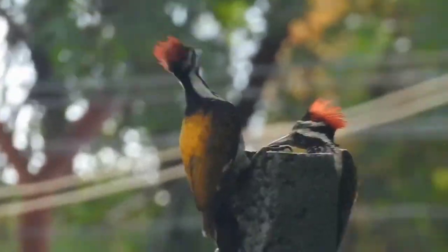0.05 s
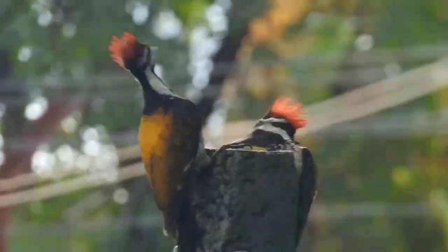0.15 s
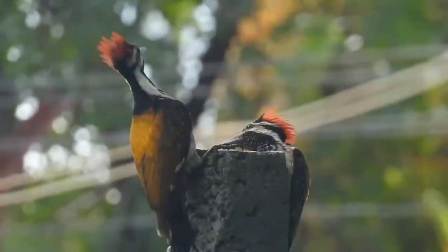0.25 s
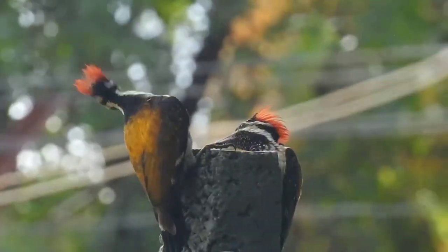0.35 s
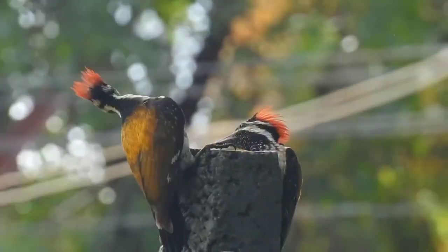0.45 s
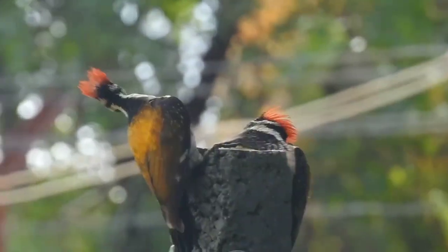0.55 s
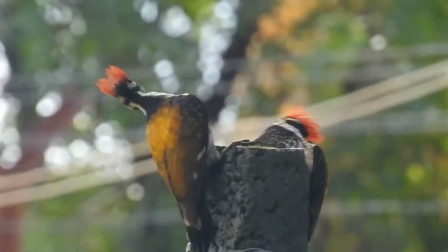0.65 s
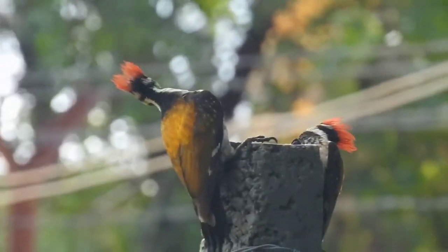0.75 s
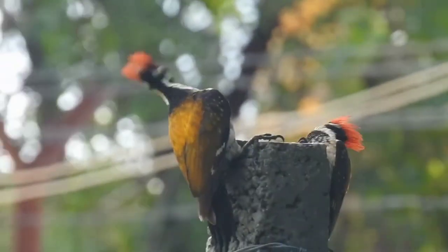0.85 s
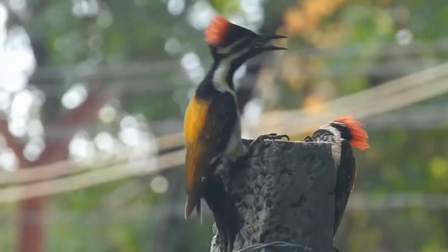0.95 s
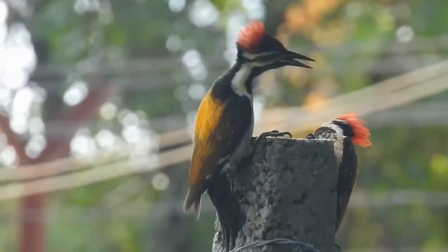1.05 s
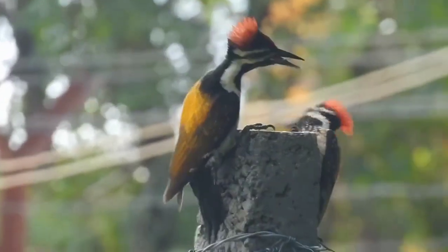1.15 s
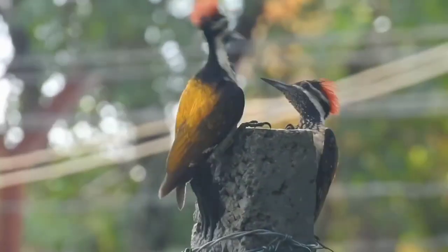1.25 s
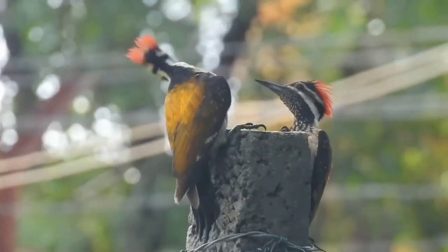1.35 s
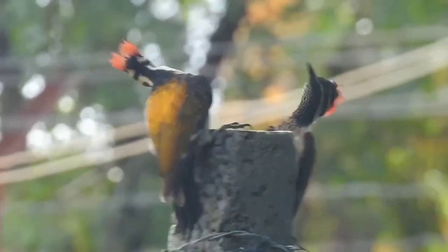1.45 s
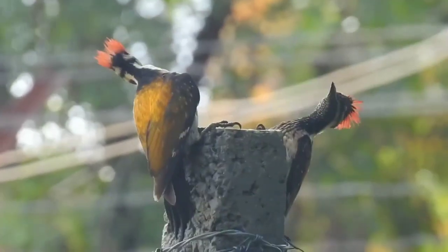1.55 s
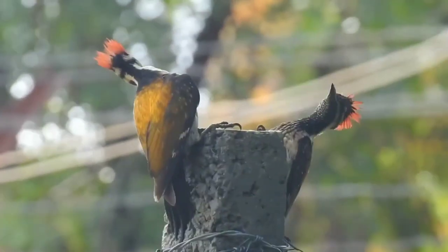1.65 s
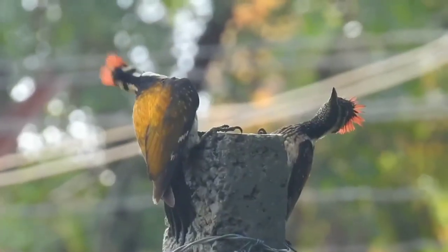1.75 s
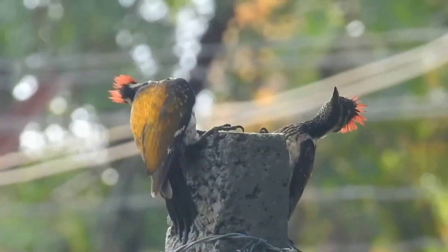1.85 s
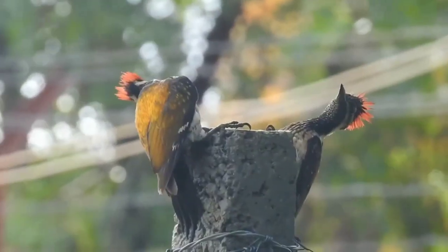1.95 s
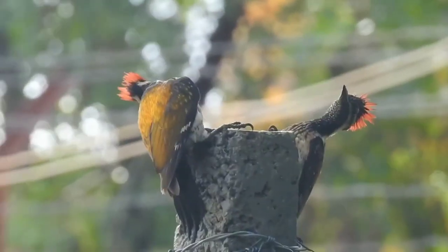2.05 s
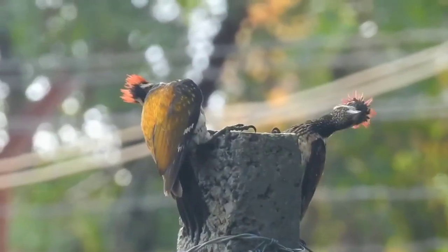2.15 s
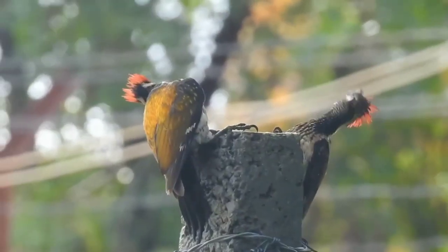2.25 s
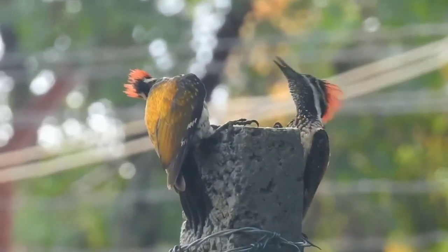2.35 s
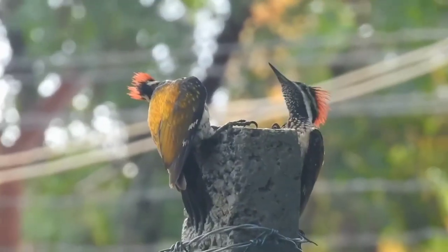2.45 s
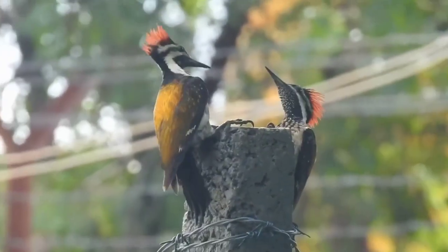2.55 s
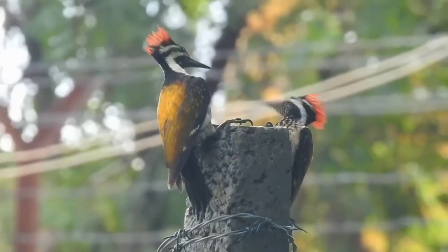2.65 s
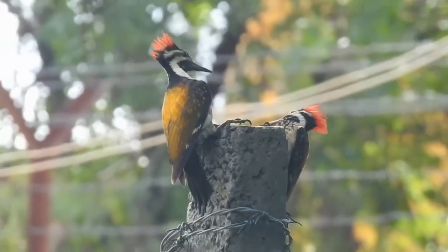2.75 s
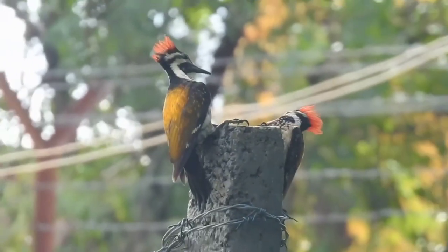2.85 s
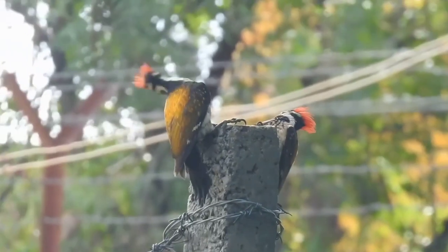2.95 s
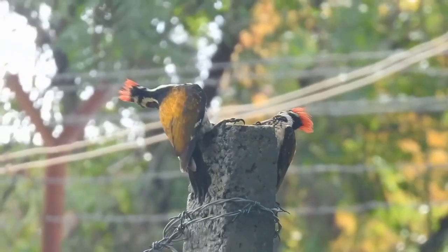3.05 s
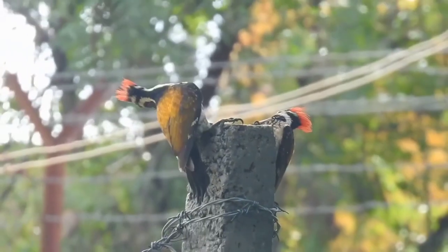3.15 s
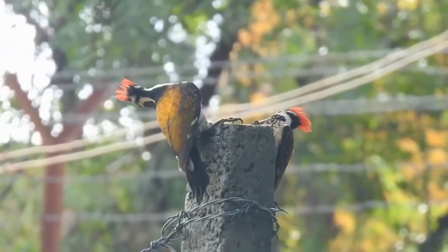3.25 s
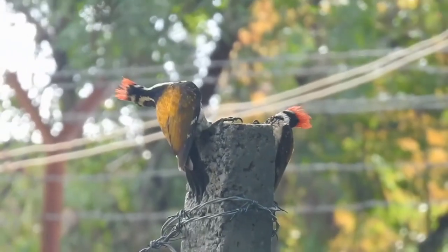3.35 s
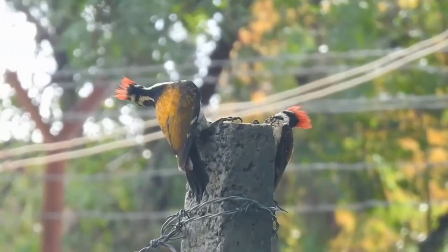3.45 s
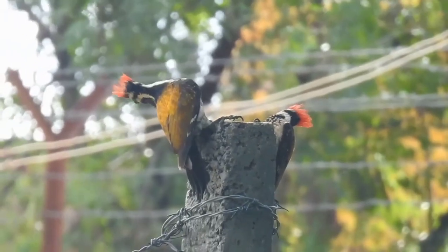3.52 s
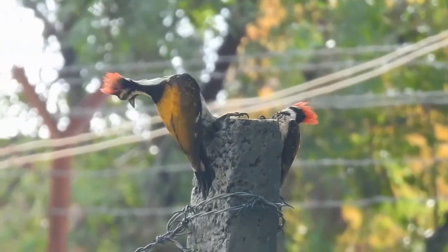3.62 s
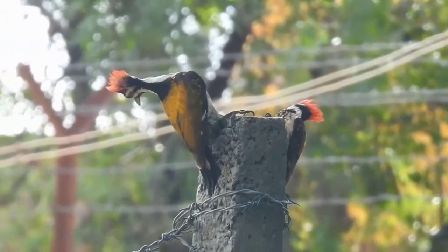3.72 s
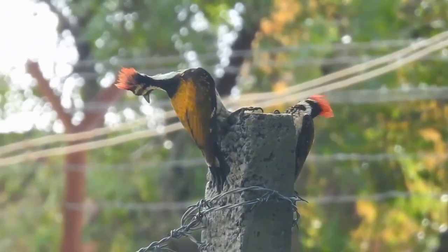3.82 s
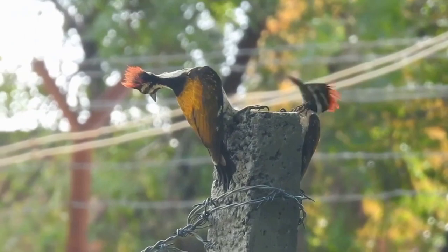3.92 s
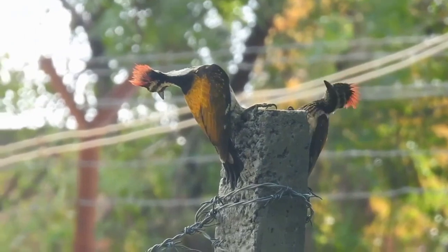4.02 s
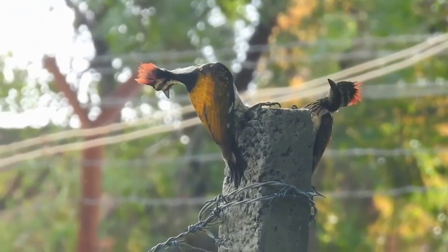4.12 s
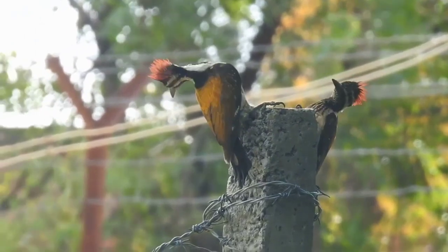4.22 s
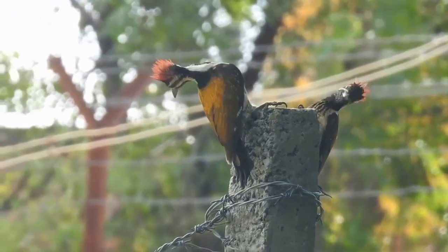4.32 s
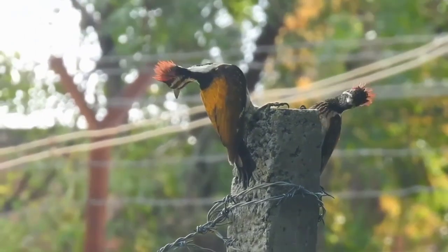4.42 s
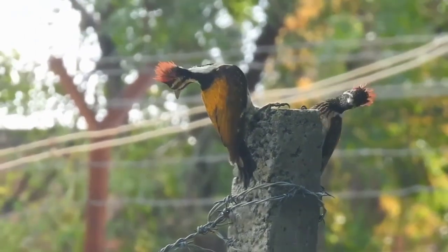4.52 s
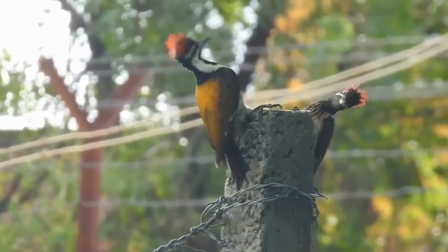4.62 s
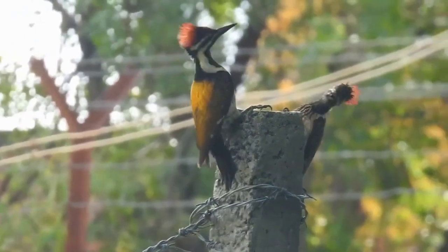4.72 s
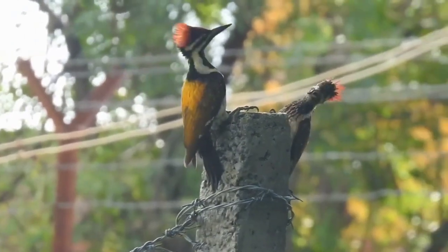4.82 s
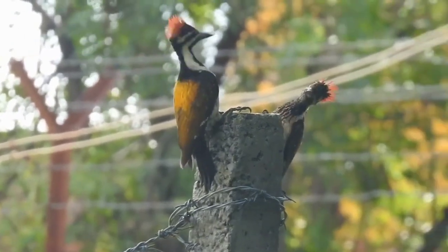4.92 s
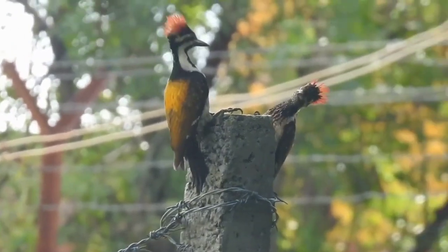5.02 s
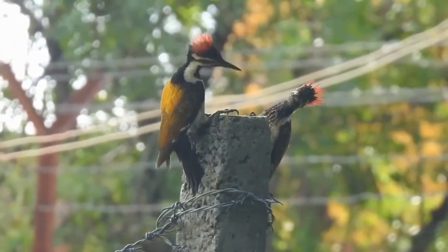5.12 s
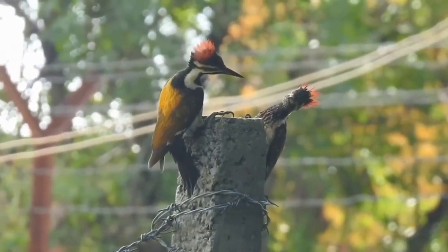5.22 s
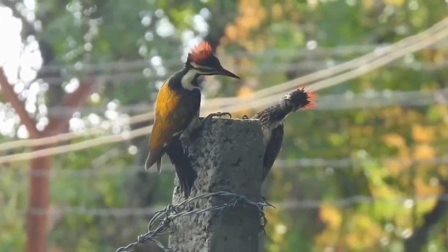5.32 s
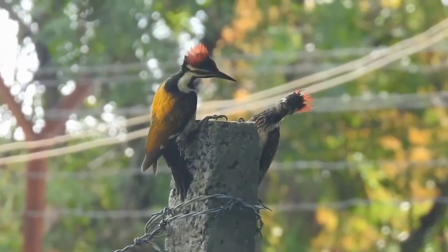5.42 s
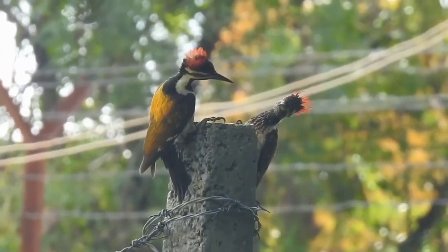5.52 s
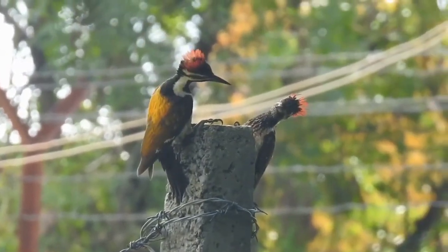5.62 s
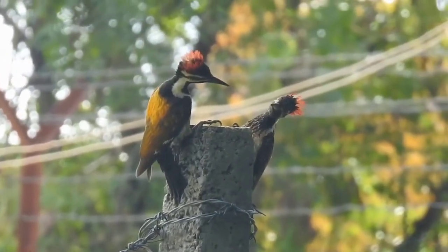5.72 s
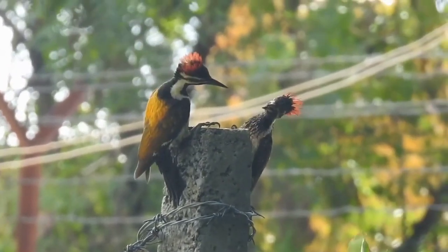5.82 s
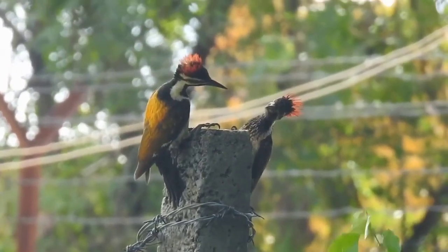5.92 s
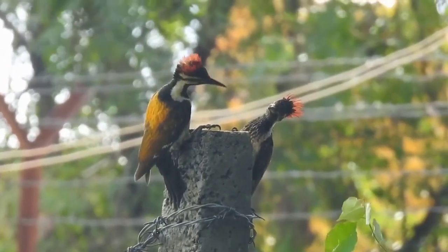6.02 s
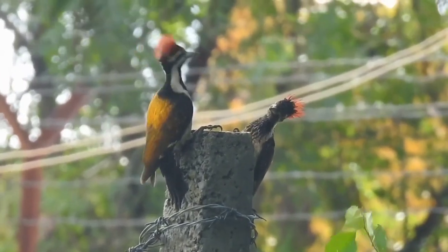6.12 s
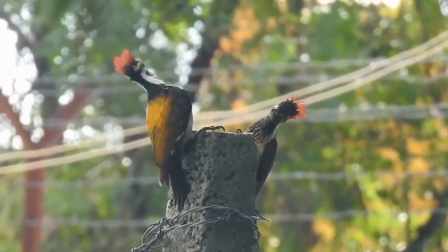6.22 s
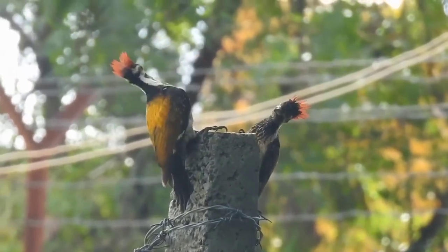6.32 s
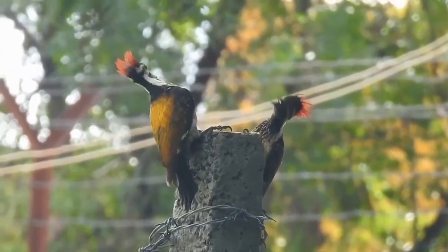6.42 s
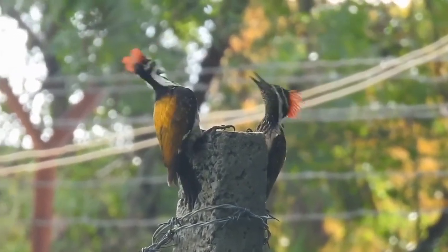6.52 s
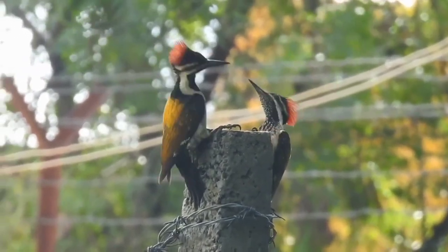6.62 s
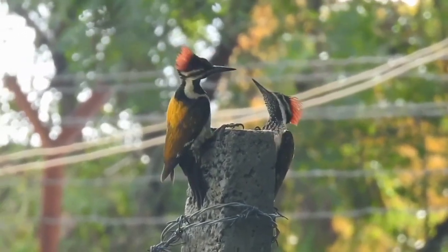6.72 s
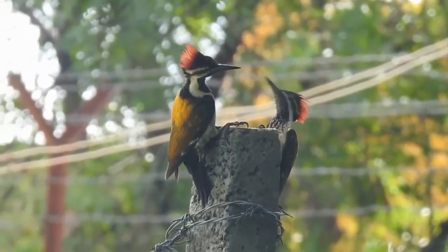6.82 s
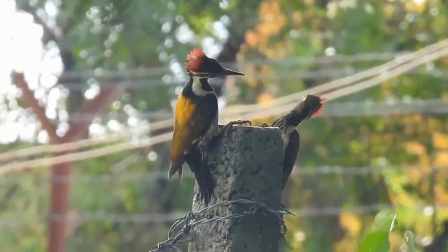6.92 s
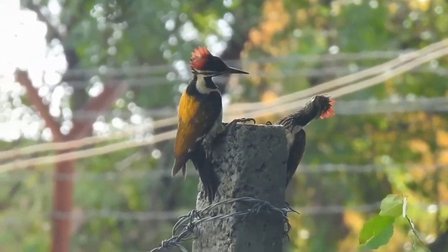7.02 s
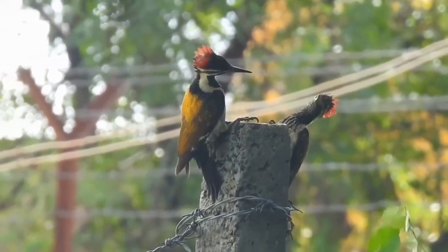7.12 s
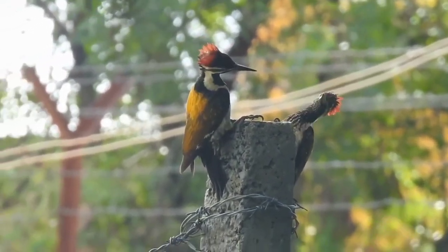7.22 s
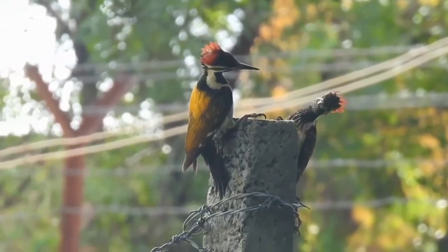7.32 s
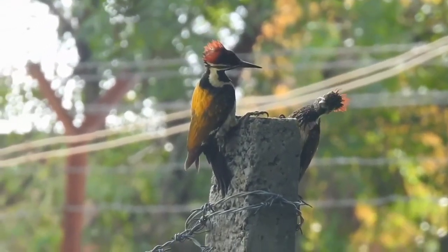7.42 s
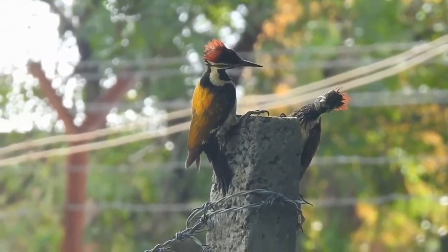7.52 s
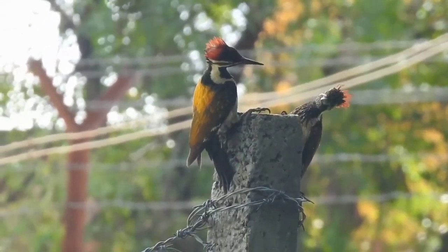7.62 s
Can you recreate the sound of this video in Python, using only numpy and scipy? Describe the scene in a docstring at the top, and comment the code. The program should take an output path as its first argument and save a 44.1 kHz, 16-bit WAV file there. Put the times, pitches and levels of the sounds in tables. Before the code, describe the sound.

Outdoors among trees, a pair of woodpeckers squabbles in brief, piercing, buzzy squawks, each under a fifth of a second, clear at first and then cracked and rough. The cries come unevenly, clustered early on and again near the end, with quiet stretches between. A continuous low roar leaning left, soft broadband air and thin hiss fill the gaps, with two faint taps midway and soft falling far bird notes at the end.

```python
"""A squawk already under way opens the scene: two woodpeckers squabble on a concrete post among trees.
Each cry is a harmonic stack that scoops up to a nasal note, sags and breaks into a rasping warble;
fixed throat and bill resonances colour it, and ground and trees throw it back as echoes and scatter.
Behind lie a low rumble, airy noise and a thin high hiss, all shaped from noise,
with a few faint far birds (gliding sines) and two soft knocks (decaying bursts of filtered noise)."""
import sys
import numpy as np
from scipy import signal
from scipy.fft import rfft, irfft, next_fast_len
from scipy.io import wavfile

SR = 44100
rng = np.random.default_rng(int(sys.argv[2]) if len(sys.argv) > 2 else 0)


def file_out(sig):
    """Save sig as 16-bit WAV at sys.argv[1]."""
    # one column per channel
    cols = np.atleast_2d(sig).T
    # limit, then scale
    lim = np.clip(cols, -1, 1)
    pcm = np.round(lim * 32767).astype(np.int16)
    wavfile.write(sys.argv[1], SR, pcm)


N = 337806
TIME = np.arange(N) / SR


def from_db(db):
    """Decibels to amplitude gain."""
    return 10 ** (np.asarray(db) / 20)


def rms_one(x):
    """Scale to unit power."""
    return x / np.sqrt(np.mean(x ** 2) + 1e-20)


def at_hz(points, hz, axis=1):
    """Read one column of a table on a log-frequency axis."""
    points = np.array(points)
    return np.interp(np.log(np.maximum(hz, 1)), np.log(points[:, 0]), points[:, axis])


def drift(rate, size):
    """Smooth chance of unit rms: noise low-passed at about `rate` Hz."""
    count = 2 ** 15 if size < 2 ** 15 else next_fast_len(size)
    hz = np.fft.rfftfreq(count, 1 / SR)
    smooth = rfft(rng.standard_normal(count)) / (1 + (hz / rate) ** 4)
    return rms_one(irfft(smooth, count))[:size]


def panned(x, left_db):
    """Place a sound by the level difference, left minus right, in dB."""
    return x * from_db(np.array([[.5], [-.5]]) * left_db)


def through(x, resonances):
    """Pass a short sound through the fixed resonances of a cavity."""
    hz = np.fft.rfftfreq(SR, 1 / SR)
    return irfft(rfft(x, SR) * from_db(at_hz(resonances, hz)), SR)[:len(x)]


# how alike surrounding sound is at the two ports: f/Hz, likeness (0 to 1)
SURROUND_LIKENESS = [(60, .88), (150, .9), (300, .86), (1000, .96), (3500, .95), (4400, .67), (5900, .24),
                     (8000, .12), (8600, .93)]
# which side surrounding sound leans to: f/Hz, left minus right level/dB
SURROUND_LEAN = [(60, 11), (120, 8.5), (240, 3.5), (470, 2.5), (940, 0), (1880, 1.0), (3730, 0),
                 (7430, 2.0), (14800, -2.5)]


def outdoor_noise(spectrum, size=N):
    """Coloured noise from all sides: a shared and an opposed part set the width; the mono sum has rms 1."""
    hz = np.fft.rfftfreq(size, 1 / SR)
    mid, side = rfft(rng.standard_normal((2, size)))
    alike = np.clip(at_hz(SURROUND_LIKENESS, hz), 0, .99)
    pair = np.sqrt(1 + alike) * mid + np.sqrt(1 - alike) * side * np.array([[1], [-1]])
    pair /= np.sqrt(1 + alike)
    leaning = panned(pair, at_hz(SURROUND_LEAN, hz))
    out = irfft(leaning * from_db(at_hz(spectrum, hz)), size)
    return out / np.std(out.mean(axis=0))


# colour of the low roar: f/Hz, relative level/dB per Hz
RUMBLE_COLOUR = [(13, -47), (22, -24), (48, -6.5), (102, -1), (156, 0), (190, -0.5), (257, -19.5),
                 (300, -23.5), (390, -24), (660, -120)]
# the deep part holds and then sinks late on, centred on SINK_AT_S; the upper part eases off steadily
DEEP_DB, DEEP_SINK_DB, SINK_AT_S, SINK_TAKES_S = -45.3, 3.8, 6.1, .6
UPPER_DB, EASING_DB_PER_S = -44.1, .28
RUMBLE_SWELL_DB, RUMBLE_SWELL_HZ = .7, 1.9   # rms size and rate of the chance swells


def rumble(split_hz=115):
    """Far-off low roar: dark noise whose deep and upper parts swell independently by chance."""
    roar = outdoor_noise(RUMBLE_COLOUR)
    deep = irfft(rfft(roar) * (np.fft.rfftfreq(N, 1 / SR) < split_hz), N)
    sunk = np.clip(.5 + (TIME - SINK_AT_S) / SINK_TAKES_S, 0, 1)
    deep_db = DEEP_DB - DEEP_SINK_DB * sunk
    upper_db = UPPER_DB - EASING_DB_PER_S * TIME
    out = np.zeros((2, N))
    for part, level_db in [(deep, deep_db), (roar - deep, upper_db)]:
        swell_db = RUMBLE_SWELL_DB * drift(RUMBLE_SWELL_HZ, N)
        out += part / np.std(part.mean(axis=0)) * from_db(level_db + swell_db)
    return out


# colour of the airy bed, also fed to the hiss: f/Hz, relative level/dB per Hz
AIR_COLOUR = [(160, -21), (270, -4), (495, -3), (566, -3), (669, -1), (1500, -4.5), (1830, -5), (2280, -6),
              (3250, -4), (4180, -5), (5560, -4), (6150, 1.5), (8470, -17.5), (12100, -28), (15000, -35)]


def air(level_db=-42.76, stir_db=2.44, stir_hz=16.0):
    """Broad airy noise; ten bands in its middle range rise and fall independently."""
    edges = np.geomspace(260, 2300, 11)
    band_of = np.digitize(np.fft.rfftfreq(N, 1 / SR), edges)
    bins = rfft(outdoor_noise(AIR_COLOUR))
    # the bottom and top stay still
    out = irfft(bins * ((band_of == 0) | (band_of == len(edges))), N)
    for k in range(1, len(edges)):
        out += irfft(bins * (band_of == k), N) * from_db(stir_db * drift(stir_hz, N))
    return from_db(level_db) * out


def hiss(centre_hz=6070, width_hz=82, level_db=-55.5, waver_db=1.0, waver_hz=8.8):
    """Thin high hiss: a narrow band of noise whose level wavers."""
    edges = [centre_hz - width_hz / 2, centre_hz + width_hz / 2]
    band = signal.butter(1, edges, "band", fs=SR, output="sos")
    narrow = rms_one(signal.sosfilt(band, outdoor_noise(AIR_COLOUR)))
    return narrow * from_db(level_db + waver_db * drift(waver_hz, N))


# soft far knocks: t/s, starting level/dB
KNOCK_TIMES = [(3.379, -39), (4.459, -50)]


def knocks(low_hz=600, high_hz=1150, t60=0.14):
    """Dull short taps some way off: band-passed noise that starts at once and dies exponentially."""
    bursts = sum(from_db(db - 60 * np.abs(TIME - s) / t60) * (TIME > s) for s, db in KNOCK_TIMES)
    band = signal.butter(2, [low_hz, high_hz], "band", fs=SR, output="sos")
    return bursts * rms_one(signal.sosfilt(band, rng.standard_normal(N)))


# faint far notes: t/s, length t/s, first f/Hz, last f/Hz, level/dB before the send to the trees
FAR_NOTES = [(6.593, 0.034, 3830, 3780, -43), (6.967, 0.076, 2436, 1930, -43),
             (7.026, 0.092, 1896, 1730, -43.5), (7.137, 0.106, 1520, 1447, -47)]


def far_birds(waver=0.1, waver_hz=199.4):
    """Soft falling notes: gliding sines in half-sine swells, blurred by a fast relative pitch waver."""
    out = np.zeros(N)
    for start, length, first_hz, last_hz, level_db in FAR_NOTES:
        along = np.clip((TIME - start) / length, 0, 1)
        hz = (first_hz + (last_hz - first_hz) * along) * (1 + waver * drift(waver_hz, N))
        note = np.sin(2 * np.pi * np.cumsum(hz) / SR)
        out += from_db(level_db) * np.sin(np.pi * along) * note
    return out


# colour of the scatter from trunks and leaves: f/Hz, relative level/dB
SCATTER_COLOUR = [(1500, -5), (2800, -1), (3200, -8), (4200, 6.5), (6000, 2), (7200, 5), (9500, 8.5),
                  (14000, -9)]
# near reflections: delay t/s, left level/dB, right level/dB
NEAR_ECHOES = [(.0062, -7, -10), (0.0139, -7.5, -9.5), (0.025, -10.5, -17), (0.096, -36, -21)]


def among_trees(x, near_db=-8.5, near_t60=0.37, far_db=-12.5, far_t60=1.0, build_up_s=0.0072):
    """A few discrete reflections, plus diffuse scatter from leaves and far trunks as decaying noise."""
    t = np.arange(SR) / SR
    build_up = 1 - np.exp(-t / build_up_s)
    tail = np.zeros(SR)
    for db, t60 in [(near_db, near_t60), (far_db, far_t60)]:
        tail += from_db(db) * rms_one(build_up * from_db(-60 * t / t60))
    response = outdoor_noise(SCATTER_COLOUR, size=SR) * tail / np.sqrt(SR)
    for delay, left_db, right_db in NEAR_ECHOES:
        response[:, int(delay * SR)] += from_db([left_db, right_db])
    return signal.fftconvolve(x[None], response, axes=1)[:, :N]


# how the two microphone ports hear the birds: f/Hz, left minus right level/dB, left lead/rad
PORT_DIFFERENCE = [(1500, 1, .02), (2800, 2.5, .07), (4420, -0.5, 0.013), (5850, 2.5, 0.67),
                   (7000, -2.5, 0.61), (9000, 0.2, .02)]


def from_the_post(x):
    """Set level and phase at the two ports for sound from the birds' side."""
    hz = np.fft.rfftfreq(N, 1 / SR)
    lead = np.exp(.5j * np.array([[1], [-1]]) * at_hz(PORT_DIFFERENCE, hz, axis=2))
    return irfft(panned(rfft(x) * lead, at_hz(PORT_DIFFERENCE, hz)), N)


BURST_AFTER_S, BURST_DB = .013, 2.5   # just after the break the voice bursts back, low and loud
CATCH_S, CATCH_OCTAVES = .0045, .11   # width and pitch drop of one catch
STUMBLE_GAP_S, STUMBLE_DB = .036, 3.5   # mean gap and typical level dip of the later stumbles


def catches(t, breaks, dip_db):
    """Pitch drop (octaves) and level drop (dB): the voice breaks, bursts back, then stumbles unevenly."""
    gaps, depths = rng.uniform(.6, 1.4, (2, 8))
    falter = np.exp(-((t - breaks) / CATCH_S) ** 2)
    burst = np.exp(-((t - breaks - BURST_AFTER_S) / CATCH_S) ** 2)
    stumble_s = breaks + BURST_AFTER_S + STUMBLE_GAP_S * np.cumsum(gaps)
    stumbles = np.exp(-((t[:, None] - stumble_s) / CATCH_S) ** 2) @ depths
    drop_octaves = CATCH_OCTAVES * (burst + stumbles)
    drop_db = dip_db * falter - BURST_DB * burst + STUMBLE_DB * stumbles
    return drop_octaves, drop_db


# resonances of the throat and open bill: f/Hz, gain level/dB
THROAT_RESONANCES = [(1100, -21.5), (1450, -21.5), (1750, -27), (2100, 1), (2500, 2), (2950, 1), (3100, -3),
                     (3280, -34), (3500, -4.5), (3900, -17.5), (4300, -16), (4700, -39)]
# upper resonances of the bill: f/Hz, gain level/dB
BILL_RESONANCES = [(4700, -30), (5100, -4), (5600, -5), (6100, 6), (6700, -0.5), (7500, -7), (7900, -18.5),
                   (8800, -26.5), (10200, -24), (11500, -35), (14500, -38)]
SWELL_DB, SWELL_S = 12, .017   # each cry starts this far down and swells with this time constant
DULL_START_DB, OPENING_S = 20, .008   # the overtones come in as the bill opens
BREAK_BRIGHT_DB, TIRING_BRIGHT_DB = 1, 3   # they gain when the voice breaks, and again towards the end


def squawk(start, end, pitch_hz, sag, breaks, dip_db, level_db, fade_db, bright_db,
           scoop=.45, scoop_s=.0065, warble_hz=46, clear_warble=0.031, rough_warble=.026,
           clear_jitter=.015, rough_jitter=0.022, flutter=0.43, overtone_db=-1.5,
           clear_fray=0.035, rough_fray=0.1, rattle_hz=270, rattle_depth=0.55, turbulence_db=-37):
    """One cry of the syrinx: a harmonic stack swept through the fixed resonances of throat and bill."""
    inside = (TIME >= start) & (TIME < end)
    t = TIME[inside]
    age, size = t - start, len(t)
    rough = .5 + .5 * np.tanh((t - breaks - BURST_AFTER_S) / 0.013)   # 0 clear, 1 broken
    tiring = (age / (end - start)) ** 2

    # the pitch scoops up, sags, and warbles unevenly in arches with sharp dips between them
    cycle = np.cumsum(warble_hz * (1 + 0.1955 * drift(29.7, size))) / SR
    warble = np.pi * np.abs(np.sin(np.pi * cycle)) - 2
    octaves = -scoop * np.exp(-age / scoop_s) - sag * tiring
    octaves += warble * (clear_warble + rough * rough_warble)
    drop_octaves, drop_db = catches(t, breaks, dip_db)
    jitter = drift(625, size) * (clear_jitter + rough * rough_jitter)
    octaves += jitter - drop_octaves
    phase = 2 * np.pi * np.cumsum(pitch_hz * 2 ** octaves) / SR
    # single cycles come early or late, which frays the high overtones most
    frayed = phase + drift(650, size) * (clear_fray + rough * rough_fray)

    # the membranes rattle and chop the tone into uneven pulses, hardest once the voice breaks
    rattle = np.sin(2 * np.pi * np.cumsum(rattle_hz * (1 + 0.196 * drift(110, size))) / SR)
    chop_log = rattle_depth * (0.22 + 0.75 * rough) * rattle
    chop_log += flutter * np.tanh(drift(126, size)) + 0.065 * warble
    chop = np.exp(chop_log)
    tone = sum(np.sin(k * phase) for k in range(1, 4))
    overtones = sum(np.sin(k * frayed) for k in range(4, 11))
    rasp = (0.51 + 1.07 * rough) * rng.standard_normal(size)

    # the throat favours the second harmonic, the bill the fourth and fifth
    low = rms_one(through(tone * chop, THROAT_RESONANCES))
    high = rms_one(through((overtones * (1 - 0.24 * rough) + rasp) * chop, BILL_RESONANCES))
    strain_db = BREAK_BRIGHT_DB * rough + TIRING_BRIGHT_DB * tiring
    strain_db -= DULL_START_DB * np.exp(-age / OPENING_S)
    voice = low + high * from_db(bright_db + strain_db + overtone_db)
    turbulence = signal.lfilter([1], [1, -.85], rng.standard_normal(size))
    voice += from_db(turbulence_db) * (0.17 + rough) * turbulence

    # the cry swells quickly, fades as the bird tires and stops short
    effort_db = level_db - SWELL_DB * np.exp(-age / SWELL_S) - fade_db * tiring - drop_db
    gate = np.clip(age / 0.0022, 0, 1) * np.clip((end - t) / 0.0023, 0, 1)
    out = np.zeros(N)
    out[inside] = voice * gate * from_db(effort_db)
    return out


# the cries, before the trims on overtones and the pair: start t/s, end t/s, pitch f/Hz,
# sag by the end/octaves, voice break t/s, dip at the break level/dB (negative: a rise), level/dB,
# fade by the end level/dB, overtones relative level/dB
CRIES = [(-.04, 0.116, 1510, 0.05, 0.055, -2, -28, 8, -3.5),
         (.829, 0.991, 1499, 0.078, 0.93, 12, -21, 3, -8),
         (1.124, 1.286, 1470, 0.035, 1.168, 6, -18.5, 5, -6),
         (1.292, 1.414, 1470, .05, 1.325, -4.5, -18.5, 6, -4.5),
         (2.419, 2.613, 1429, .04, 2.522, -2.5, -20, 7.5, -8),
         (4.943, 5.116, 1490, .12, 5.042, 0, -20.5, 5.5, -5.5),
         (5.961, 6.129, 1465, 0.12, 6.05, 2, -21.5, 5.5, -5.5),
         (6.642, 6.801, 1443, 0.031, 6.76, -5, -22, 2.5, -6)]


def squabble(trim_db=-0.68):
    """Every cry of the pair, each driven by its own breath, break and tiring."""
    return from_db(trim_db) * sum(squawk(*row) for row in CRIES)


def scene(far_birds_db=6.5):
    """The pair sits a little left of centre; the far birds arrive only as reflections and scatter."""
    pair = squabble()
    birds = from_the_post(pair + among_trees(pair))
    far = from_db(far_birds_db) * among_trees(far_birds())
    return rumble() + air() + hiss() + knocks() + far + birds


def record(dry, cutoff_hz=15000):
    """Cut the top steeply with an elliptic low-pass."""
    steep = signal.ellip(10, .1, 80, cutoff_hz, fs=SR, output="sos")   # ripple and stopband in dB
    return signal.sosfilt(steep, dry)


dry = scene()
out = record(dry)
file_out(out)
```